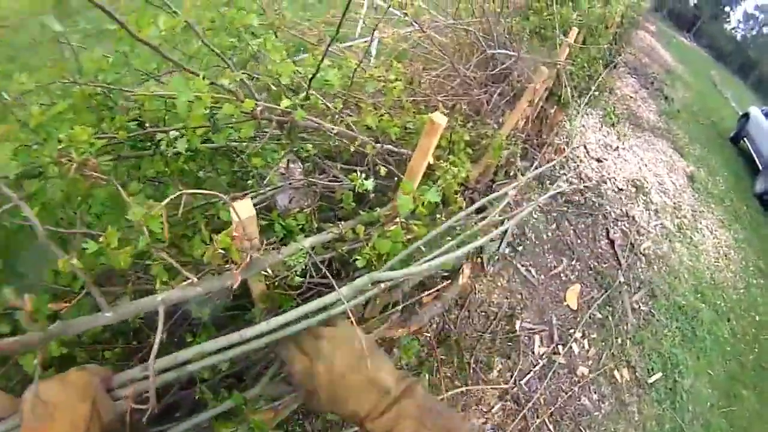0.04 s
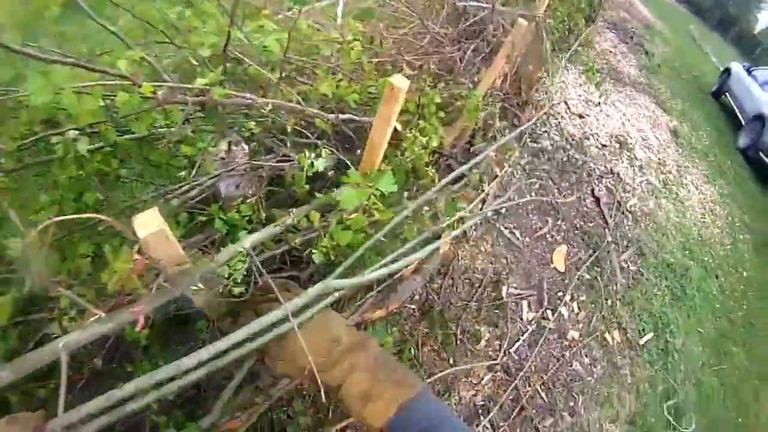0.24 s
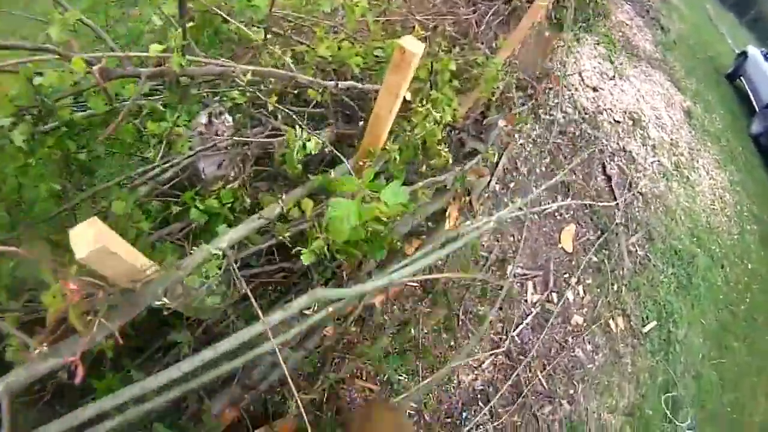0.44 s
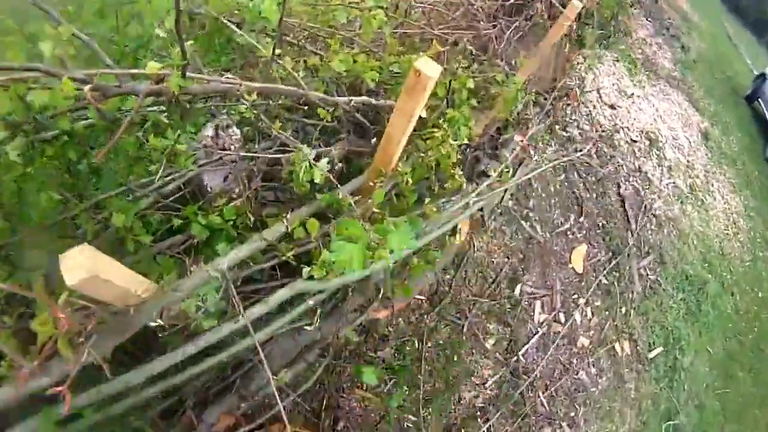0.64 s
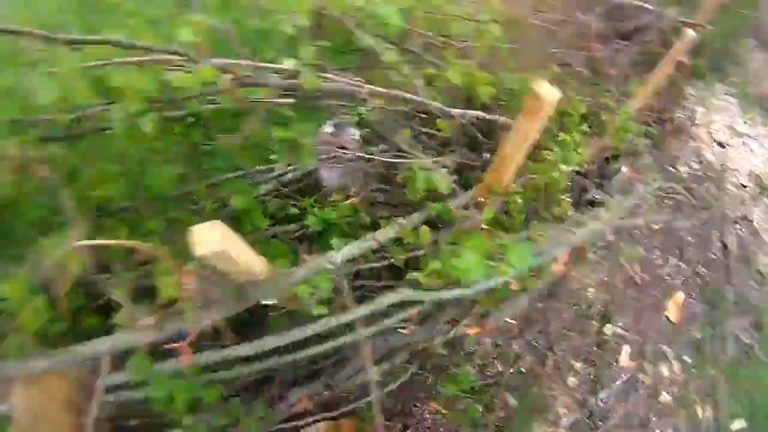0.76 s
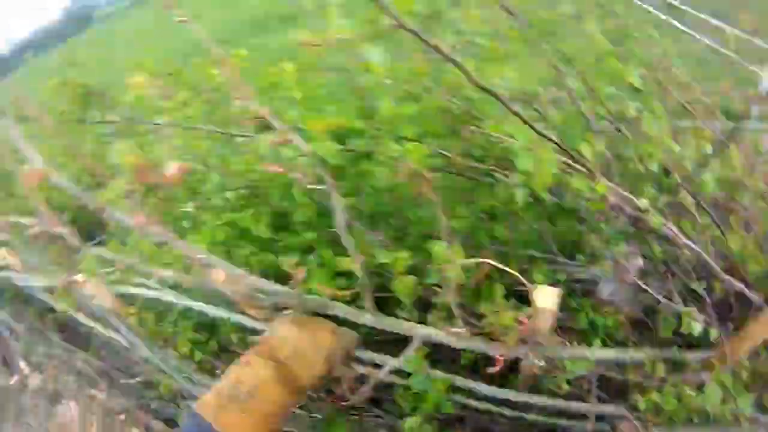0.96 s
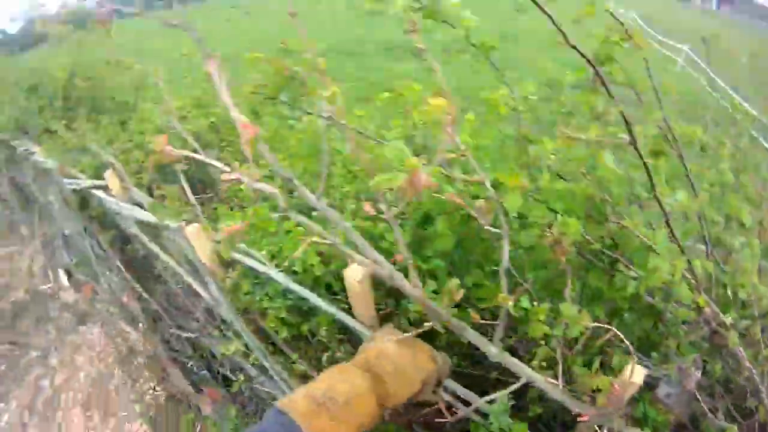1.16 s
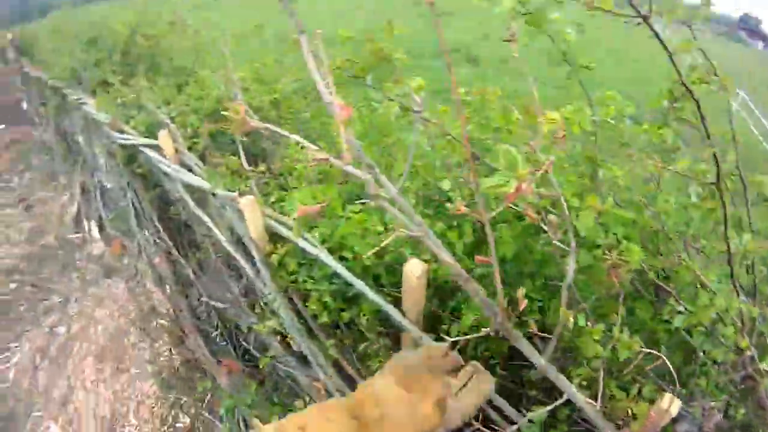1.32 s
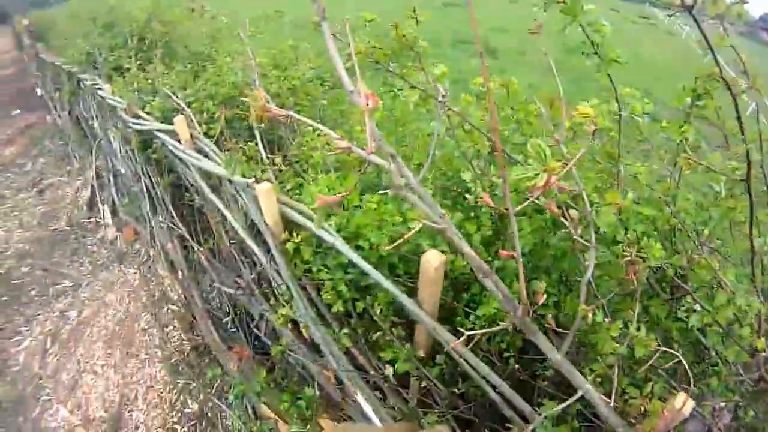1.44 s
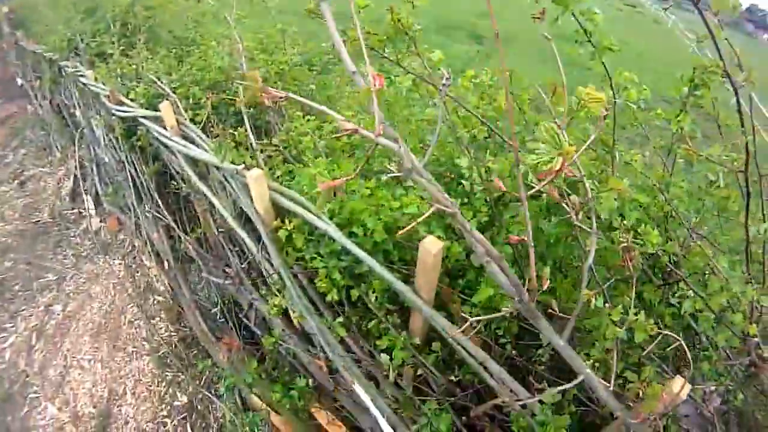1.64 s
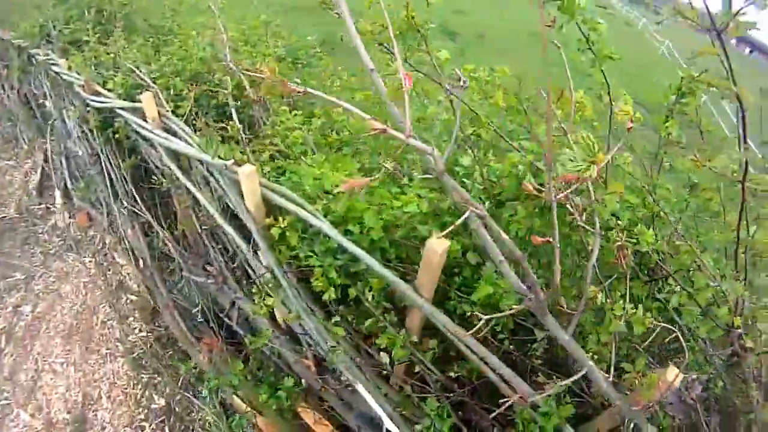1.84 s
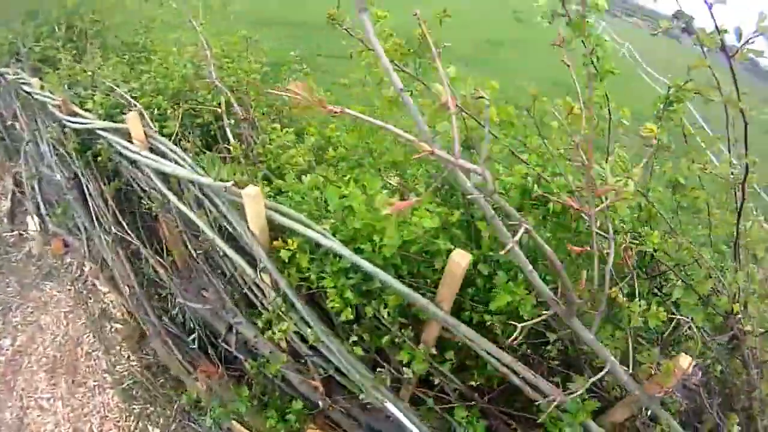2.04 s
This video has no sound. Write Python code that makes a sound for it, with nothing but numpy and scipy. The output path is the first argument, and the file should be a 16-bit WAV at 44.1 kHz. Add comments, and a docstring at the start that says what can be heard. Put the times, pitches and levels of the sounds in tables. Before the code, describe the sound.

Two light snaps, a swelling crackle of foliage with twig cracks, tiny bark squeaks, then a very loud sharp clack and a weaker one, heard outdoors very close, over low uneven rumble.

```python
"""Twigs and leaves scrape past in one crackling sweep; sharp snaps, close by, set a hard case ringing.
Rods are being worked into a laid hedge outdoors, heard from a body-worn microphone inside that case.
Scraping is showers of tiny damped rings over leaf hiss; snaps are impulses into the modes of the case;
twigs and bark squeaks are short bursts of resonant noise.
Underneath lie a low outdoor rumble, a faint hiss and a thin high whine, all of shaped noise."""
import sys
import numpy as np
from scipy import signal
from scipy.fft import rfft, irfft
from scipy.io import wavfile

SR = 44100
rng = np.random.default_rng(int(sys.argv[2]) if len(sys.argv) > 2 else 0)


def dump_mix(stems):
    """Bounce the given channels to the path in sys.argv[1] as a 16-bit WAV at rate SR."""
    frames = np.atleast_2d(stems).T  # one column per channel
    limited = np.clip(frames, -1, 1)  # hard clip at full scale
    pcm = np.round(limited * 32767).astype(np.int16)
    wavfile.write(sys.argv[1], SR, pcm)


N = 91816
T = np.arange(N) / SR


def from_db(db):
    """Decibels to amplitude gain."""
    return 10 ** (np.asarray(db) / 20)


def rms_one(x):
    """Scale to unit power."""
    return x / np.sqrt(np.mean(x ** 2) + 1e-20)


def white():
    """White noise as long as the scene."""
    return rng.standard_normal(N)


def level(points):
    """Gain over time, joining (time_s, level_db) points by straight lines in dB."""
    time_s, level_db = np.transpose(points)
    return from_db(np.interp(T, time_s, level_db))


def swells(rows):
    """Gain over time from bell-shaped swells (centre_s, level_db, length_s); length is one deviation."""
    return sum(from_db(level_db) * np.exp(-0.5 * ((T - centre_s) / length_s) ** 2)
               for centre_s, level_db, length_s in rows)


def drift(rate_hz):
    """Slow random wander with spread 1: noise through a double-pole low-pass."""
    pole = np.exp(-2 * np.pi * rate_hz / SR)
    wander = signal.lfilter([1], [1, -2 * pole, pole * pole], rng.standard_normal(2 * N))
    return rms_one(wander[N:])  # the first half lets the filter settle


def spectrum_gain(points):
    """Gain over the spectrum from (pitch_hz, level_db) points, with the frequencies it applies to."""
    pitch_hz, level_db = np.transpose(points)
    f = np.maximum(np.fft.rfftfreq(N, 1 / SR), 1)
    return f, from_db(np.interp(np.log(f), np.log(pitch_hz), level_db))


def coloured(x, colour):
    """Filter to a spectrum that falls away steeply outside its end points; unit power."""
    f, gain = spectrum_gain(colour)
    low_hz, high_hz = 0.85 * colour[0][0], 1.15 * colour[-1][0]
    skirts = 1 / np.sqrt((1 + (low_hz / f) ** 10) * (1 + (f / high_hz) ** 10))
    return rms_one(irfft(rfft(x) * gain * skirts, N))


def band(pitch_hz, width_hz, order=1):
    """Noise in one resonance; unit power."""
    edges = np.clip([pitch_hz - width_hz / 2, pitch_hz + width_hz / 2], 10, 0.45 * SR)
    return rms_one(signal.sosfilt(signal.butter(order, edges, "band", fs=SR, output="sos"), white()))


def ring(clicks, pitch_hz, t60_s):
    """Damped resonator: a unit click starts a sine of height 1 that falls 60 dB in t60_s."""
    r = 10 ** (-3 / (t60_s * SR))
    w = 2 * np.pi * pitch_hz / SR
    return signal.lfilter([0, np.sin(w)], [1, -2 * r * np.cos(w), r * r], clicks + 1e-18)


def dying(start_s, t60_s):
    """Envelope that rises quickly at start_s and decays by 60 dB in about t60_s."""
    attack_s = 0.0005
    age = np.maximum(T - start_s, 0)
    return (1 - np.exp(-age / attack_s)) * np.exp(-np.log(1000) * age / t60_s)


# level of the deep rumble, before flutter: time_s [s], level_db [dB]
RUMBLE_LEVEL = [(0.02, -31.5), (0.04, -42), (0.08, -32.5), (0.33, -37.5), (0.42, -31), (0.51, -42),
                (0.83, -33), (0.96, -41.5), (0.97, -34.5), (1.07, -36), (1.12, -24), (1.26, -37.5),
                (1.28, -28), (1.34, -37), (1.42, -28), (1.63, -39), (1.7, -27), (1.77, -36.5), (1.81, -26),
                (1.86, -35.5), (1.94, -24.5), (2.08, -42)]
# spectrum of the deep rumble: pitch_hz [Hz], level_db [relative dB per Hz]
RUMBLE_COLOUR = [(11, -30), (18, -7), (59, 2.5), (125, -7.5), (160, -20), (280, -120)]
# level of the upper rumble, before its trim: time_s [s], level_db [dB]
DRONE_LEVEL = [(0.02, -45), (0.06, -42.5), (0.39, -39.5), (0.88, -47.5), (0.91, -54.5), (0.98, -41.5),
               (1.05, -45), (1.2, -37), (1.29, -42.5), (1.36, -41.5), (1.64, -44), (1.72, -38.5),
               (2.07, -41.5), (2.08, -42)]
# spectrum of the upper rumble: pitch_hz [Hz], level_db [relative dB per Hz]
DRONE_COLOUR = [(130, -2), (160, -2), (200, 0), (255, -8), (310, -14), (430, -25)]
RUMBLE_FLUTTER_DB, DRONE_TRIM_DB = 0.5, 1


def rumble():
    """Deep rumble of air and movement with a steadier drone above it: two low noises, same in both ears."""
    flutter = from_db(RUMBLE_FLUTTER_DB * drift(28))
    deep = level(RUMBLE_LEVEL) * flutter * coloured(white(), RUMBLE_COLOUR)
    drone = level(DRONE_LEVEL) * from_db(DRONE_TRIM_DB) * coloured(white(), DRONE_COLOUR)
    return deep + drone


# spectrum of the outdoor hiss: pitch_hz [Hz], level_db [relative dB per Hz]
AIR_COLOUR = [(210, -26.5), (350, -0.5), (466, -3), (1060, -12), (1710, -15.5), (3030, -20), (5030, -32.5),
              (6080, -38.5), (7360, -33), (11100, -32.5), (12200, -36.5), (12800, -29), (15500, -38)]
AIR_DB = -54.5
WHINE_HZ, WHINE_WIDTH_HZ, WHINE_DB = 11980, 300, -71


def air():
    """Steady outdoor hiss of shaped noise, and a thin high electronic whine of narrow-band noise."""
    hiss = from_db(AIR_DB) * coloured(white(), AIR_COLOUR)
    whine = from_db(WHINE_DB) * band(WHINE_HZ, WHINE_WIDTH_HZ, order=2)
    return hiss + whine


def catches(per_s, spread_db):
    """Random clicks of uneven size and either sign, as twigs catch and let go."""
    sizes = from_db(spread_db * np.minimum(rng.exponential(1, N), 4)) * rng.choice([-1, 1], N)
    return sizes * (rng.random(N) < per_s / SR)


CRACKLES_PER_S, CRACKLE_SPREAD_DB = 4000, 3.5
CRACKLE_CYCLES = 16  # cycles in which a crackle falls 60 dB
CRACKLE_DB, SMOOTH_DB = -1, -6  # mix before colouring


def friction():
    """Tiny twig crackles, each click ringing at one pitch, mostly high, over a smooth hiss of leaves."""
    pitches = np.geomspace(420, 14500, 24)
    chance = np.sqrt(pitches) / np.sqrt(pitches).sum()
    clicks = catches(CRACKLES_PER_S, CRACKLE_SPREAD_DB)
    pitch_of_click = rng.choice(len(pitches), N, p=chance)
    crackle = np.zeros(N)
    for k, pitch_hz in enumerate(pitches):
        rings = ring(clicks * (pitch_of_click == k), pitch_hz, CRACKLE_CYCLES / pitch_hz)
        crackle += (-1) ** k * pitch_hz ** 0.75 * rings  # neighbouring pitches have opposite signs
    return from_db(CRACKLE_DB) * rms_one(crackle) + from_db(SMOOTH_DB) * white()


# foliage scraping past, before flutter: time_s [s], level_db [dB]
SCRAPE = [(0, -60), (0.18, -71.5), (0.3, -58), (0.42, -56), (0.515, -52.5), (0.555, -42), (0.592, -52),
          (0.62, -43), (0.635, -40), (0.67, -33), (0.685, -44.5), (0.703, -40), (0.745, -45), (0.775, -43),
          (0.80, -55.5), (0.86, -58.5), (1.0, -57), (1.09, -61.5), (1.16, -67), (2.08, -69)]
# spectrum of the scrape: pitch_hz [Hz], level_db [relative dB per Hz]
SCRAPE_COLOUR = [(180, -31), (300, -1.5), (492, -0.5), (581, -9), (674, -1.5), (1020, -1), (1350, -3.5),
                 (1620, -3), (2250, -4.5), (3690, -8.5), (4720, -10.5), (6050, -28.5), (7500, -13),
                 (11500, -24.5), (15500, -20.5)]
# leaves brushing lightly over the case, before flutter: centre_s [s], level_db [dB], length_s [s]
BRUSHES = [(0.51, -58, 0.022), (0.73, -45, 0.0082), (0.82, -47.5, 0.013), (0.935, -50, 0.016),
           (0.995, -60, 0.0096), (1.03, -58, 0.026), (1.243, -47, 0.0073), (1.325, -53.5, 0.013),
           (1.48, -56.5, 0.043)]
# spectrum of the brushes: pitch_hz [Hz], level_db [relative dB per Hz]
BRUSH_COLOUR = [(700, -7), (1700, -3), (2500, 4), (3400, -2.5), (4600, -12.5), (6200, -24), (8000, -19),
                (9500, -5), (11000, -41), (14500, -11), (16000, -28)]
SCRAPE_FLUTTER_DB = 2.3


def foliage():
    """Twigs scrape past in one uneven sweep and leaves brush the case: friction under moving levels."""
    sweep = level(SCRAPE) * coloured(friction(), SCRAPE_COLOUR)
    brush = swells(BRUSHES) * coloured(friction(), BRUSH_COLOUR)
    return (sweep + brush) * from_db(SCRAPE_FLUTTER_DB * drift(33))


# sharp snaps close to the case: start_s [s], level_db [dB],
# splinter_db [dB re level_db], woody_db [extra drive of the woody modes, dB]
SNAPS = [(0.1276, -25, -13.5, 5), (0.4373, -29.5, -13, 4), (1.0200, -41.5, -16, 0),
         (1.1110, -18.5, -18.5, 3.5), (1.1149, -29.5, -21, -9), (1.277, -8.5, -21, -1.5),
         (1.29, -14, -17, -0.5), (1.2931, -14, -21, -2), (1.3020, -30, -22, -2), (1.544, -29.5, -12.5, 5),
         (1.9549, -44, -16, 3), (1.9585, -45.5, -21, 4)]
# modes of the hard case: pitch_hz [Hz], level_db [dB], t60_s [s]
CASE = [(2156, -3, 0.027), (2376, 2, 0.033), (2800, -43, 0.027), (2776, 2.5, .022), (3350, -13, 0.02),
        (3816, -22, 0.033), (4305, -20, 0.023), (7700, -24.5, 0.0076), (9160, -12.5, 0.0042),
        (9110, -16.5, 0.036), (9657, -9.5, 0.034), (14180, -9.5, 0.0093), (14700, -11.5, 0.023),
        (15200, -19, .006)]
# polarity of each mode, in the same order: sign [+1 or -1]
CASE_SIGNS = [1, 1, -1, -1, -1, 1, -1, 1, 1, 1, -1, 1, -1, 1]
# spectrum of splintering wood, also played by the twigs: pitch_hz [Hz], level_db [relative dB per Hz]
SPLINTER_COLOUR = [(1400, 7.5), (3500, 2), (4300, -16), (5200, -2), (6400, -7.5), (7800, 0.5), (9400, 7),
                   (11000, -4.5), (13000, -20), (14600, 4), (15600, -9)]
CHATTER_T60_S, CHATTER_DB = 0.073, -15  # chatter energy relative to the impulse
REBOUND_S, REBOUND_DB = 0.0064, -19.5
CRACK_T60_S = 0.031
WOODY_LOW_HZ, WOODY_HIGH_HZ = 3050, 5000
SNAP_LOW_CUT_HZ = 1970


def snaps():
    """An impulse, short chatter and weak rebound ring the beating modes of the case, with splintering."""
    force, woody, crack = np.zeros((3, N))
    for start_s, level_db, splinter_db, woody_db in SNAPS:
        chatter = white() * dying(start_s, CHATTER_T60_S)
        blow = from_db(CHATTER_DB) * chatter / np.sqrt(np.sum(chatter ** 2))
        blow[int(start_s * SR)] += 1
        blow[int((start_s + REBOUND_S) * SR)] += from_db(REBOUND_DB)
        force += from_db(level_db) * blow
        woody += from_db(level_db + woody_db) * blow
        crack += from_db(level_db + splinter_db) * dying(start_s, CRACK_T60_S)
    rings = np.zeros(N)
    for (pitch_hz, level_db, t60_s), sign in zip(CASE, CASE_SIGNS):
        drive = woody if WOODY_LOW_HZ < pitch_hz < WOODY_HIGH_HZ else force
        rings += sign * from_db(level_db) * ring(drive, pitch_hz, t60_s)
    low_cut = signal.butter(2, SNAP_LOW_CUT_HZ, "high", fs=SR, output="sos")
    return signal.sosfilt(low_cut, rings) + crack * coloured(white(), SPLINTER_COLOUR)


# twigs that crack or flick: start_s [s], level_db [dB], pitch_hz [Hz], t60_s [s]
TWIGS = [(0.206, -54.5, 3600, 0.11), (0.216, -46.5, 1540, 0.044), (0.4832, -32.5, 970, 0.013),
         (0.511, -45, 3300, 0.036), (0.5367, -43, 1340, .03), (0.554, -40, 1190, 0.064),
         (0.563, -43, 3270, 0.039), (0.6274, -32.5, 2350, 0.031), (0.6469, -27, 5640, 0.015),
         (0.6688, -28.5, 4040, 0.012), (0.6959, -37, 660, 0.063), (0.7256, -34, 3300, 0.018),
         (0.751, -33, 2940, 0.031), (0.7660, -20.5, 2820, 0.013), (0.7674, -32.5, 8800, 0.015),
         (0.8348, -44, 2570, 0.017), (0.9765, -49, 2600, 0.017), (0.9904, -48.5, 4070, .02),
         (1.0030, -34, 2160, 0.016), (1.0235, -39, 2400, .014), (1.0323, -39, 2300, 0.013),
         (1.0450, -37, 2410, 0.013), (1.778, -54, 2540, 0.05), (1.956, -49.5, 3160, 0.031)]
TWIG_WIDTH = 0.39  # resonance width as a fraction of its pitch
TWIG_SPLINTER_DB = -10  # relative to the wood resonance


def twigs():
    """A crack is a noise burst in one broad wood resonance with bright splinters on top."""
    splinters = from_db(TWIG_SPLINTER_DB) * coloured(white(), SPLINTER_COLOUR)
    total = np.zeros(N)
    for start_s, level_db, pitch_hz, t60_s in TWIGS:
        wood = band(pitch_hz, pitch_hz * TWIG_WIDTH, order=2)
        total += from_db(level_db) * dying(start_s, t60_s) * (wood + splinters)
    return total


# bark squeaking on bark, before its resonances: centre_s [s], level_db [dB], length_s [s]
SQUEAKS = [(0.8845, -45, 0.003), (0.9185, -39.5, 0.0028)]
# resonances of the squeak: pitch_hz [Hz], width_hz [Hz], level_db [dB]
SQUEAK_BODY = [(1070, 150, -4.5), (4390, 160, -1.5), (7690, 320, -8)]


def squeaks():
    """Two brief slips of bark sing in three narrow resonances of noise."""
    body = sum(from_db(level_db) * band(pitch_hz, width_hz) for pitch_hz, width_hz, level_db in SQUEAK_BODY)
    return swells(SQUEAKS) * body


SIDE_LAG_S = 0.000397


def widen(x, side):
    """Stereo spread: a slightly late, filtered copy is added to one ear and subtracted from the other."""
    f, gain = spectrum_gain(side)
    lag = np.exp(-2j * np.pi * f * SIDE_LAG_S)
    return x + irfft(rfft(x) * gain * lag, N) * np.array([[1], [-1]])


# difference between the ears for the air: pitch_hz [Hz], level_db [side re mid, dB]
AIR_SIDE = [(600, -49), (1300, -34), (2400, -27.5), (4400, -8.5), (8000, -9), (15000, -27)]
# the same for foliage, twigs and squeaks: pitch_hz [Hz], level_db [side re mid, dB]
SCRAPE_SIDE = [(400, -54), (2400, -71), (4600, -42), (8000, -33.5), (15000, -16)]
# the same for the snaps: pitch_hz [Hz], level_db [side re mid, dB]
SNAP_SIDE = [(700, 1), (1300, -16), (2400, -55.5), (4400, -14.5), (6500, -3), (9400, -30), (14500, -19)]


def scene():
    """Rumble in the centre; air, hedge and snaps slightly spread."""
    hedge = foliage() + twigs() + squeaks()
    return rumble() + widen(air(), AIR_SIDE) + widen(hedge, SCRAPE_SIDE) + widen(snaps(), SNAP_SIDE)


def record(dry):
    """The top is cut steeply above 15.9 kHz by an elliptic low-pass."""
    return signal.sosfilt(signal.ellip(10, 0.2, 80, 15900, fs=SR, output="sos"), dry)


dry = scene()
out = record(dry)
dump_mix(out)
```